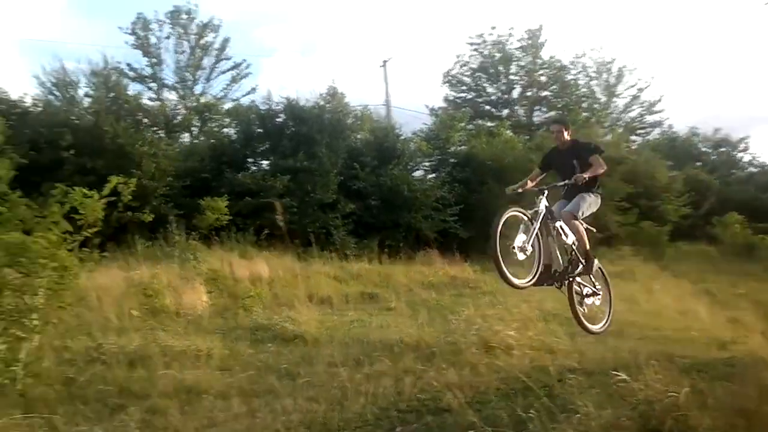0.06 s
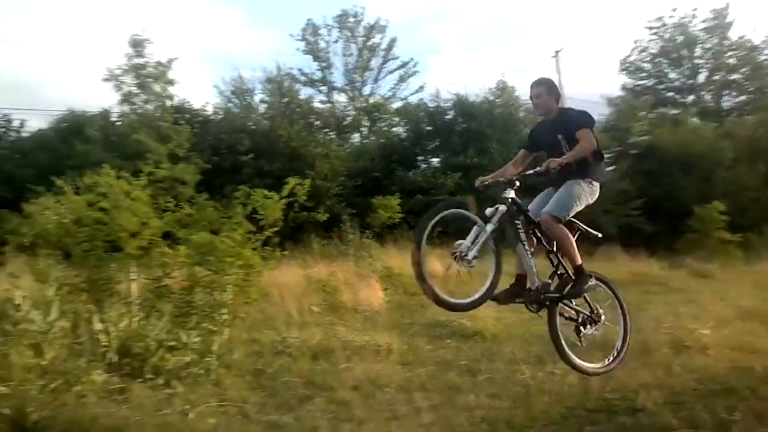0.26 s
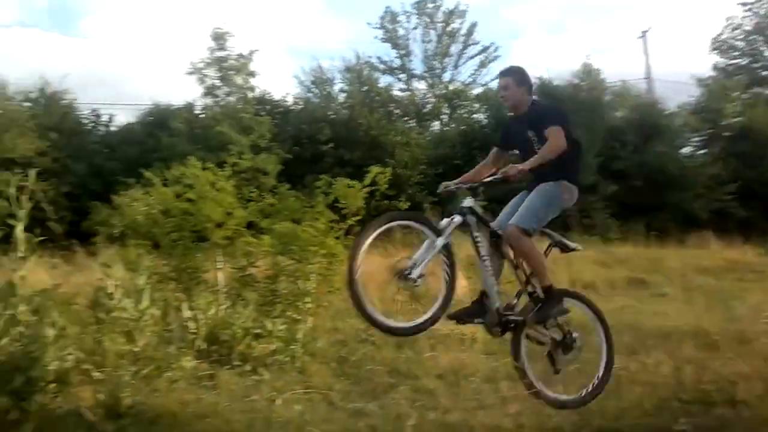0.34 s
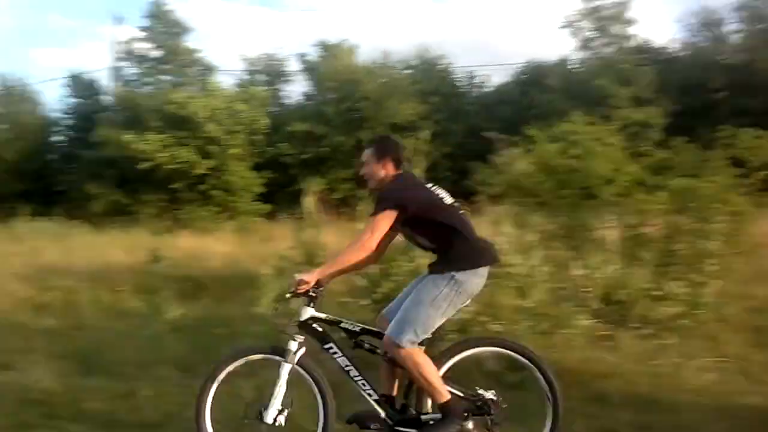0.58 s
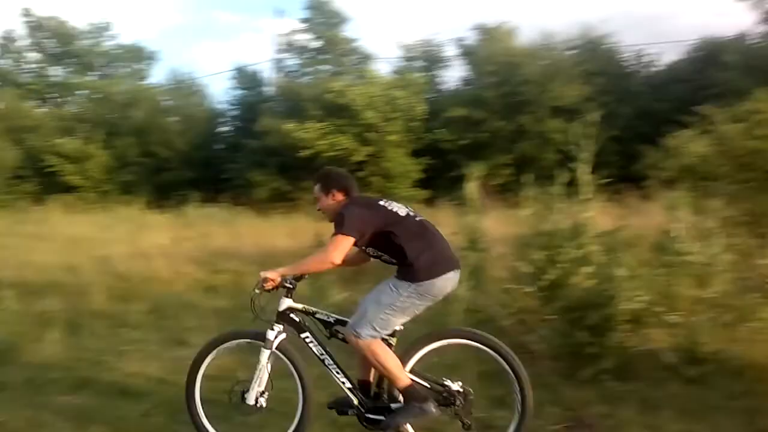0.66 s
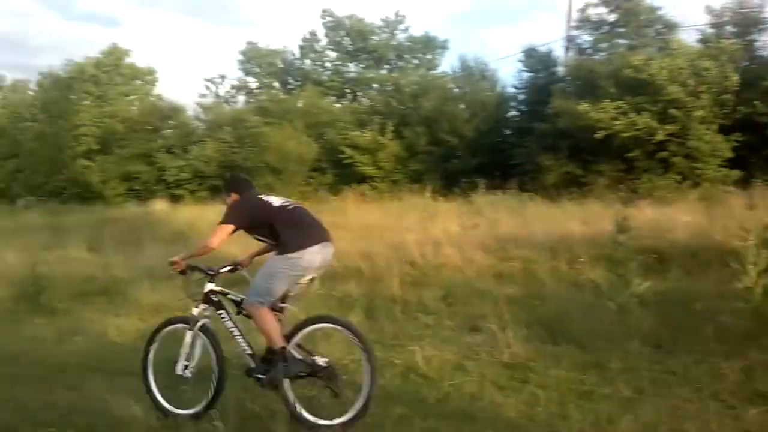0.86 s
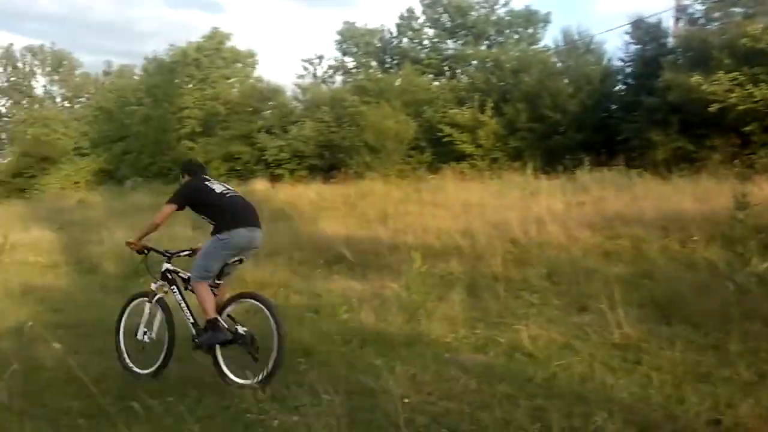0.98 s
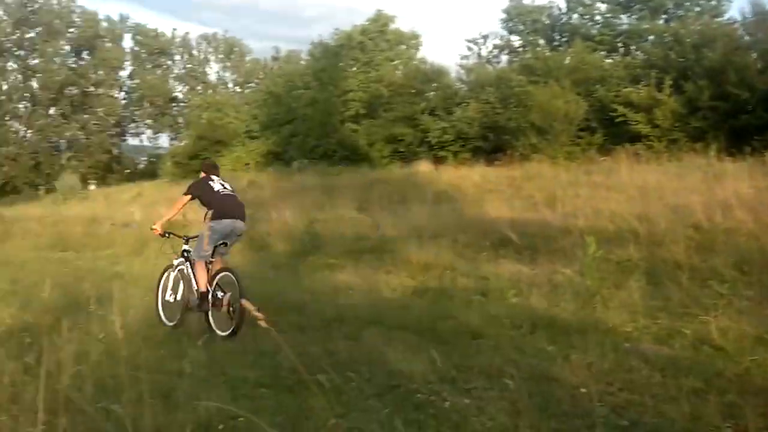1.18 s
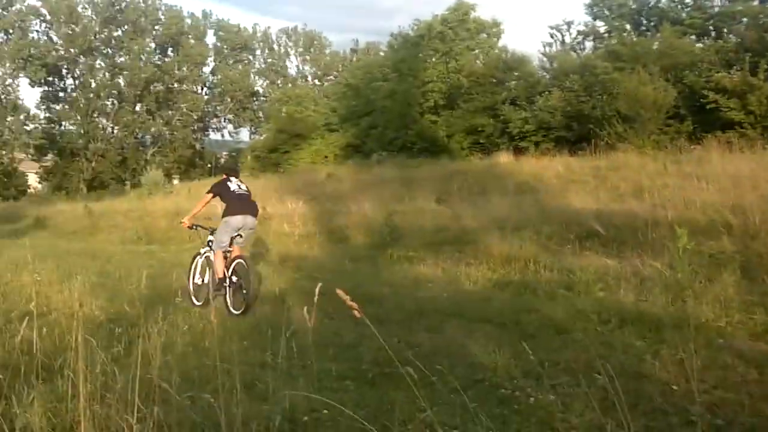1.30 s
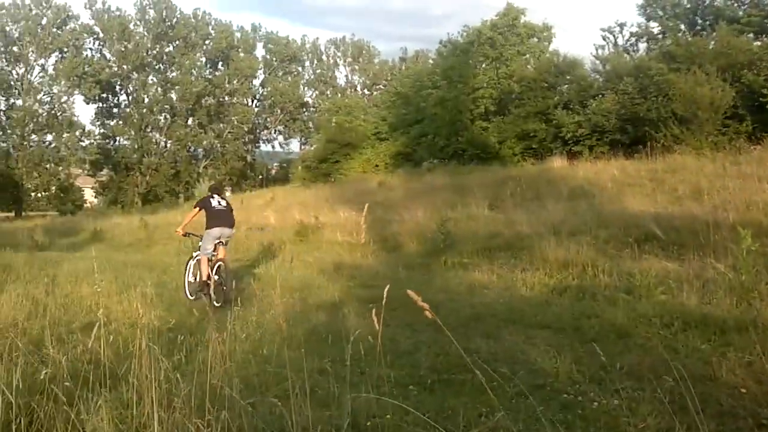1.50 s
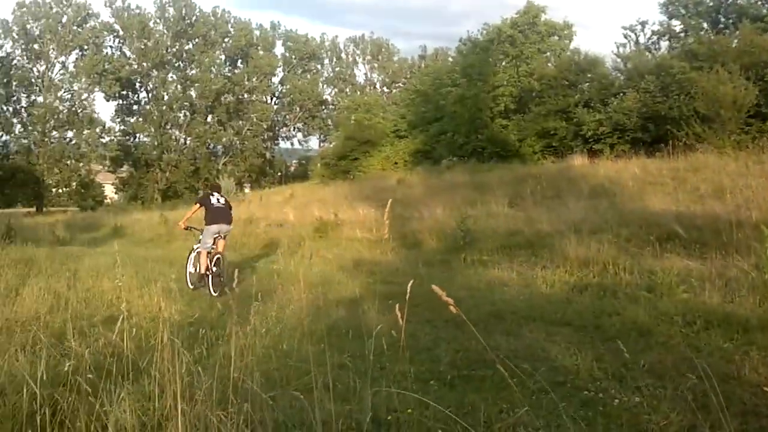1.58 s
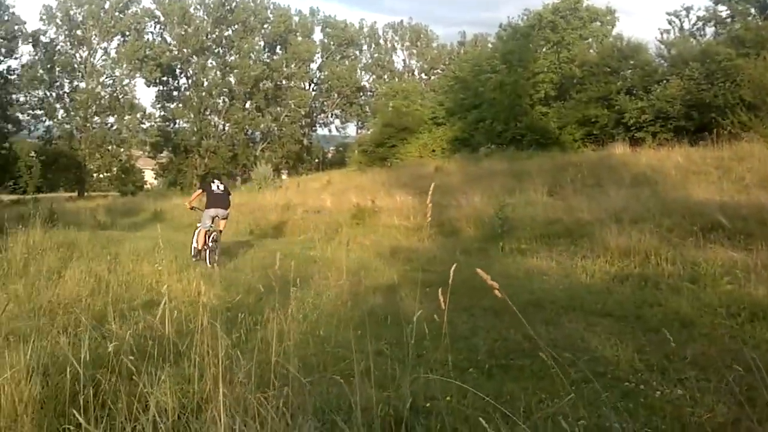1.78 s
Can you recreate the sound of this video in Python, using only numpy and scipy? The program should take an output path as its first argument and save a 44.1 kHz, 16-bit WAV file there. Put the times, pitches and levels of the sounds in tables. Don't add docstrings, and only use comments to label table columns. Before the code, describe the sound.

A mountain bike lands hard from a jump, its chain rattling as it rolls away over grass

```python
import sys
import numpy as np
from scipy import signal
from scipy.fft import rfft, irfft, next_fast_len
from scipy.io import wavfile
from scipy.ndimage import uniform_filter1d, map_coordinates

SR = 44100
rng = np.random.default_rng(int(sys.argv[2]) if len(sys.argv) > 2 else 0)


def wav_record(signal):
    frames = np.transpose(np.atleast_2d(signal))
    bounded = np.clip(frames, -1, 1)
    quanta = np.round(bounded * 32767).astype(np.int16)
    wavfile.write(sys.argv[1], SR, quanta)


def invert_db(level):
    return 10 ** (np.asarray(level, dtype=float) / 20)


N = 81585
TIME_S = np.arange(N) / SR
TOUCHDOWN_S = 0.461

# [f/Hz, width/Hz, level/dB]
FRAME_TUBES = [(946, 360, -1), (1266, 440, 0.5), (1675, 340, -2), (2086, 300, -6), (2577, 124, 1.5),
               (5200, 900, -24)]


def unit(x):
    return x / np.sqrt(np.mean(x ** 2) + 1e-20)


def along(points, hz):
    f, v = np.transpose(points)
    return np.interp(np.log(hz + 1), np.log(f + 1), v)


def curves(rows):
    s, *cols = np.transpose(rows)
    return [np.interp(TIME_S, s, c) for c in cols]


def wobble(rate):
    knots = rng.standard_normal(int(N * rate / SR) + 4)
    return map_coordinates(knots, [np.arange(N) * rate / SR])


def filtered(x, response):
    m = next_fast_len(N + SR // 2)
    return irfft(rfft(x, m) * response(np.fft.rfftfreq(m, 1 / SR)), m)[..., :N]


def coloured(x, spectrum):
    return unit(filtered(x, lambda hz: invert_db(along(spectrum, hz))))


def ringing(peaks):
    def response(f):
        total = 0
        for k, (centre, width, db) in enumerate(peaks):
            damping = 1j * f * width
            total = total + (-1) ** k * invert_db(db) * damping / (centre * centre - f * f + damping)
        return total
    return response


def swell(s, rise_s, hold_s, t60_s):
    t = TIME_S - s
    return np.clip(t / rise_s, 0, 1) * invert_db(-60 * np.maximum(t - rise_s - hold_s, 0) / t60_s)


def patchy(depth_db):
    z = signal.stft(rng.standard_normal(N), nperseg=512)[2]
    patches = uniform_filter1d(rng.standard_normal(z.shape), 6, 0)
    patches = uniform_filter1d(patches, 8, 1)
    return unit(signal.istft(z * invert_db(depth_db * unit(patches)), nperseg=512)[1][:N])


def impulses(per_s, spread_db):
    hits = rng.random(N) < per_s / SR
    sizes = invert_db(spread_db * rng.exponential(1, N))
    return unit(hits * sizes * rng.choice([-1, 1], N))


def far_leaves():
    # [f/Hz, level/dB]
    hiss = [(100, -84), (500, -75), (4000, -71), (9000, -76), (16000, -82)]
    return filtered(rng.standard_normal(N), lambda hz: invert_db(along(hiss, hz)))


def insect(calls, hz, width_hz, per_s, fade_db, edge_s):
    strokes = 1 + 0.61 * np.sin(2 * np.pi * per_s * TIME_S + wobble(30.9))
    rasp = strokes * rng.standard_normal(N)
    wing = ringing([(hz, width_hz, 0)])
    level = 0
    for s, long, db in calls:
        t = TIME_S - s
        edges = np.clip(np.minimum(t, long - t) / edge_s, 0, 1)
        level = level + invert_db(db - fade_db * t / long) * edges
    return level * unit(filtered(rasp, lambda f: wing(f) ** 2))


def low_grasshopper():
    # [t/s, length/s, level/dB]
    buzzes = [
        (.05, .04, -78),
        (.095, 0.083, -71.5),
        (.15, 0.064, -74),
        (.235, 0.038, -66),
        (.3, 0.045, -90),
        (.4, 0.15, -78),
        (1.175, 0.354, -60),
        (1.53, 0.044, -59),
        (1.56, 0.14, -68),
        (1.68, 0.4, -84),
    ]
    return insect(buzzes, hz=4970, width_hz=810, per_s=98, fade_db=4.5, edge_s=0.012)


def high_grasshopper():
    # [t/s, length/s, level/dB]
    chirps = [
        (1.225, 0.043, -68),
        (1.408, 0.11, -48),
    ]
    return insect(chirps, hz=15060, width_hz=390, per_s=180, fade_db=24, edge_s=0.0048)


def gust():
    # [t/s, level/dB]
    strength = [(0, -71.5), (.17, -74.5), (.2, -37), (.25, -36.5), (.27, -40), (.33, -43), (.38, -33),
                (.41, -43), (.45, -32.5), (.5, -33.5), (.55, -47), (.6, -36), (.68, -36.5), (.74, -46),
                (.9, -53.5), (1.2, -60), (1.77, -64), (1.82, -71)]
    # [f/Hz, level/dB per Hz]
    rumble = [(15, -1.5), (28, -6), (55, -2), (110, -7), (170, -16.5), (300, -48), (500, -33), (1000, -92)]
    level_db, = curves(strength)
    raw = coloured(rng.standard_normal(N), rumble)
    buffet = raw / np.sqrt(0.054 + np.abs(uniform_filter1d(raw ** 2, size=1500)))
    return invert_db(level_db) * buffet


def puffs():
    # [t/s, peak level/dB, f/Hz]
    thuds = [(0.425, -28, 93), (0.573, -24.5, 90.3), (0.749, -37, 87), (0.797, -35, 86),
             (0.875, -35.5, 94.5), (.935, -42, 95), (0.992, -48, 68), (1.065, -42, 82),
             (1.147, -44.5, 76.5), (1.181, -49.5, 80), (1.259, -51, 68), (1.43, -49.5, 70),
             (1.517, -45, 49.6), (1.628, -46, 70), (1.689, -43, 57.3), (1.727, -48, 48.6),
             (1.765, -51, 69.6)]
    cycles = 2.18
    out = 0
    for s, db, hz in thuds:
        t = TIME_S - s
        push = np.sin(2 * np.pi * hz * t + 1.04 * wobble(60))
        out = out + invert_db(db) * push * np.sin(np.pi * np.clip(t * hz / cycles, 0, 1))
    return out


def bike_rush():
    # [t/s, level/dB, stage: 0 flying, 1 rolling, 2 gone]
    passage = [(0, -56, -0.28), (.13, -48.5, 0), (.22, -51.5, 0), (.44, -50.5, 0.75), (.5, -40, 0.8),
               (.64, -40, 0.77), (.95, -49, 1), (1.12, -51, 0.81), (1.4, -53.5, 0.93), (1.64, -55.5, 1.7),
               (1.7, -58, 2), (1.77, -61.5, 2.5), (1.85, -56.5, 5)]
    # [f/Hz, width/Hz, level/dB]
    flying = [(820, 270, -2), (1085, 227, 1), (1553, 345, -0.5), (2935, 610, -5.5)]
    # [f/Hz, level/dB per Hz]
    rolling = [(240, -37), (400, -3), (570, -5.5), (617, -12), (862, -0.5), (1800, -8.5), (2170, -2),
               (3220, -30), (4200, -41), (5460, -15), (9240, -120)]
    # [f/Hz, level/dB per Hz]
    gone = [(240, -49), (400, -18), (542, -49), (684, -18.5), (1420, -14), (2240, -2.5), (4500, -33.5),
            (5850, -56), (9900, -120)]
    rush_db, stage = curves(passage)
    whirr_source = patchy(0.63) + 0.5 * impulses(1300, 2.8)
    whirr = unit(filtered(whirr_source, lambda f: ringing(flying)(f) ** 2))
    roll = coloured(patchy(2.7) + 0.5 * impulses(820, 0.33), rolling)
    away = coloured(patchy(3.9), gone)
    rush = 0
    for k, layer in enumerate([whirr, roll, away]):
        share = np.clip(1 - np.abs(np.clip(stage, 0, 2) - k), 0, 1)
        rush = rush + np.sqrt(share) * layer
    return invert_db(rush_db + 0.57 * wobble(17.74)) * rush


def tyre_hum():
    # [t/s, level/dB]
    roll = [(0, -77.5), (.11, -66.5), (.2, -56.5), (.44, -58.5), (.47, -47), (.62, -38), (.7, -43.5),
            (.77, -50), (.85, -45), (1.15, -52), (1.4, -57.5), (1.65, -56.5), (1.68, -62), (1.77, -61),
            (1.81, -72), (1.85, -60)]
    # [f/Hz, width/Hz, level/dB]
    tyre_air = [(182, 76, -6), (293.5, 84, 0), (372.5, 147, -2.5), (499, 210, -11.5)]
    level_db, = curves(roll)
    shaking = invert_db(2 * wobble(40.37)) * rng.standard_normal(N)
    body = ringing([(300, 500, 0)])
    return invert_db(level_db) * unit(filtered(shaking, lambda f: ringing(tyre_air)(f) * body(f)))


def tyre_bumps():
    # [t/s, peak level/dB]
    bumps = [(0.802, -33.5), (0.871, -36), (0.909, -34), (0.941, -43), (0.99, -28), (1.007, -36.5),
             (1.071, -28.5), (1.115, -31), (1.136, -29), (1.162, -30.5), (1.185, -33), (1.216, -38),
             (1.259, -29.5), (1.287, -34), (1.337, -31.5), (1.391, -36.5), (1.416, -41.5), (1.439, -35.5),
             (1.505, -38.5), (1.534, -43), (1.595, -39), (1.617, -42), (1.643, -51), (1.69, -50.5),
             (1.739, -45), (1.765, -53)]
    note_hz, wander_rad = 290.4, 0.72
    wander = wander_rad * (2 * wobble(15) + 1.57 * wobble(60))
    note = np.sin(2 * np.pi * note_hz * TIME_S + wander)
    return note * sum(invert_db(db - 9.5) * swell(s, 0.0049, 0.012, 0.066) for s, db in bumps)


def grass():
    # [t/s, length/s, level/dB]
    tufts = [(0.474, 0.032, -40), (0.505, 0.046, -45), (0.567, 0.06, -40.5), (0.644, 0.019, -47),
             (0.674, 0.067, -46), (0.752, 0.096, -48), (0.876, 0.067, -50.5), (0.96, 0.058, -51),
             (1.042, 0.063, -55.5), (1.111, 0.038, -54.5), (1.187, 0.12, -71)]
    # [f/Hz, level/dB per Hz]
    blades = [(1470, -58), (2500, 4), (3180, -4), (3620, -5), (6470, -4.5), (7490, -11), (11500, -13),
              (15600, -20.5)]
    far_s, far_hz = 1.05, 8100
    level = sum(invert_db(db) * swell(s, 0.012, long, 0.076) for s, long, db in tufts)
    clumps = invert_db(1.8 * wobble(90))
    stalks = impulses(per_s=8400, spread_db=2)
    swish = coloured(clumps * (stalks + patchy(3)), blades)
    dull = filtered(swish, lambda f: 1 / (1 + (f / far_hz) ** 4))
    near = np.clip((far_s - TIME_S) / 0.024, 0, 1)
    return level * (near * swish + (1 - near) * dull)


def frame_knock(blows):
    def tubes(f):
        bass_cut = 1j * f / (500 + 1j * f)
        return ringing(FRAME_TUBES)(f) * bass_cut / (1 + 1j * f / 4000) ** 2
    return invert_db(9.5) * filtered(blows * rng.standard_normal(N), tubes)


def chain():
    # [t/s, peak level/dB, main ring f/Hz, frame knock level/dB, flurry/s]
    clanks = [(0.4725, -36, 15300, -20, 0.0018), (0.481, -37.5, 5030, 21, 0.0046),
              (.5125, -32.5, 8970, 11.5, 0.0088), (0.5223, -29.5, 5200, -1, 0.0058),
              (0.5338, -30.5, 8130, 0, 0.0065), (0.5701, -23, 4480, 8.5, 0.0023),
              (0.5735, -24, 4480, 7.5, 0.0061), (0.586, -29, 6600, -5, .005),
              (0.5955, -27, 6550, -1, 0.015), (0.6107, -27.5, 5230, -7, 0.0049),
              (0.6576, -26.5, 3635, 12, 0.0015), (.6898, -35, 3650, 12, 0.0045),
              (.7195, -28, 9300, -5, 0.0027), (0.728, -30, 11100, -1, 0.0042),
              (0.754, -41, 5200, 9, 0.0033), (0.82, -36, 9670, 6, 0.0026), (.855, -55, 2700, 20, 0.003),
              (0.8837, -35.5, 6260, 0, .002), (0.9013, -34, 3505, 8, 0.0022),
              (0.932, -47, 5100, 20, 0.0016), (0.9711, -28.5, 6330, -1.5, .006),
              (0.987, -33, 6300, 1, .002), (0.996, -42, 6000, 5, 0.0042), (1.026, -45, 6900, 12, 0.012),
              (1.066, -65, 2290, 27, .001), (1.096, -46.5, 5760, 24, 0.0025),
              (1.1216, -52.5, 3260, 19, 0.006), (1.1416, -44, 6870, -8, 0.0066),
              (1.414, -51.5, 6430, 12, 0.0037)]
    # [f/Hz, width/Hz, level/dB]
    link_modes = [(3710, 120, -11.5), (4480, 130, -8), (5100, 136, -3), (6500, 280, -4), (8070, 135, -8.5),
                  (9120, 160, -9.5), (11000, 800, -10.5), (11300, 350, -7.5), (14500, 1100, -29)]
    dulls_hz_s = 12000
    blows, out = np.zeros(N), np.zeros(N)
    for s, db, hz, knock_db, flurry_s in clanks:
        rough = 1.1 * wobble(450)
        ring = np.sin(2 * np.pi * hz * TIME_S + rough)
        out += invert_db(db - 9) * swell(s, 0.0013, flurry_s, 0.03) * ring
        links = swell(s, 0.001, flurry_s, 0.02)
        blows += invert_db(db + knock_db - 10) * links
        parts = [(c, 2 * w, level - 2.5 + rng.normal(0, 3.5)) for c, w, level in link_modes]

        def rattle(f):
            return ringing(parts)(f) / (1 + 1j * f * (s - TOUCHDOWN_S) / dulls_hz_s)
        out += invert_db(db + 5.5) * filtered(links * rng.standard_normal(N), rattle)
    return out + frame_knock(blows)


def slap():
    # [t/s, peak level/dB]
    hits = [
        (.4622, -25),
        (.4643, -16),
        (.4667, -19),
        (.4693, -19),
        (.4715, -25),
    ]
    # [f/Hz, level/dB, time to fall 60 dB/s]
    modes = [(272.5, -5.5, 0.071), (920, -3.5, 0.025), (1300, -5, 0.016), (1720, -5, 0.013),
             (2140, -13, 0.0076), (2606, -3.5, 0.02), (2930, -8.5, 0.013)]
    top_hz = 3250
    ring = 0
    for s, db in hits:
        for hz, level, t60 in modes:
            loudness = invert_db(db + level + rng.normal(0, 3.7)) * swell(s, 0.00064, 0, t60)
            ring = ring + loudness * np.sin(2 * np.pi * hz * (TIME_S - s))
    scrape = unit(filtered(rng.standard_normal(N), ringing(FRAME_TUBES)))
    scrape = invert_db(-26.5) * swell(TOUCHDOWN_S, 0.003, 0.007, 0.039) * scrape

    def dull(f):
        return ringing([(top_hz / 3, top_hz, 0)])(f) / (1 + (f / top_hz) ** 12)
    return filtered(invert_db(-3) * ring + scrape, dull)


def scene():
    meadow = far_leaves() + low_grasshopper() + high_grasshopper()
    wind = gust() + puffs()
    rolling_bike = bike_rush() + tyre_hum() + tyre_bumps() + grass()
    landing = chain() + slap()
    return (meadow + wind + rolling_bike + landing)[None]


def low_pass(x):
    return signal.sosfilt(signal.butter(12, 15840, fs=SR, output="sos"), x)


def record(dry):
    mix = filtered(dry, lambda hz: hz < 15830)
    return low_pass(mix)


dry = scene()
out = record(dry)
wav_record(out)
```